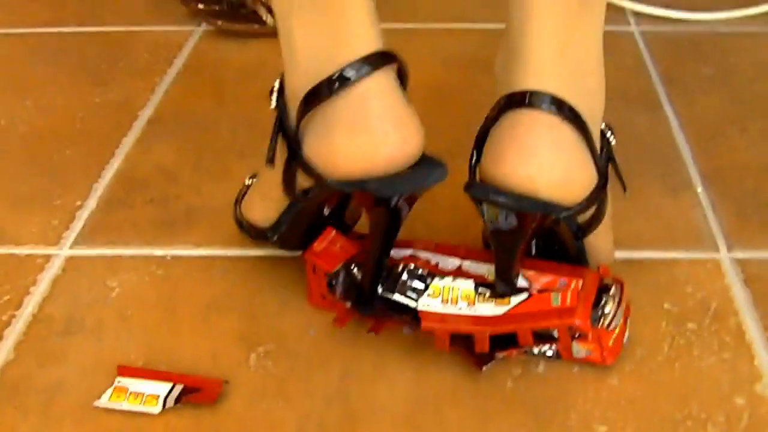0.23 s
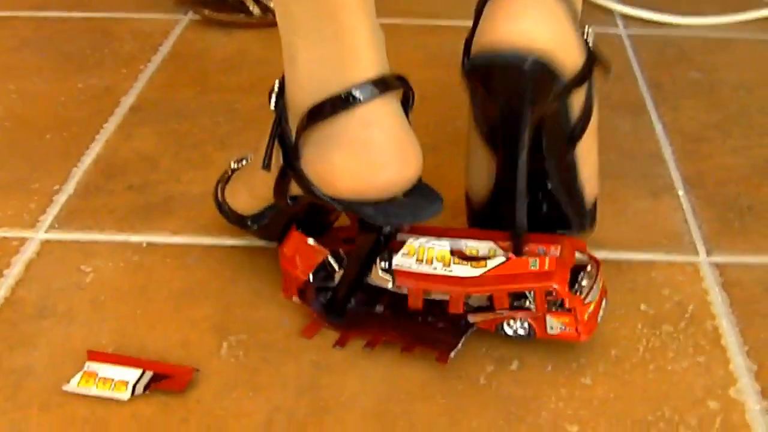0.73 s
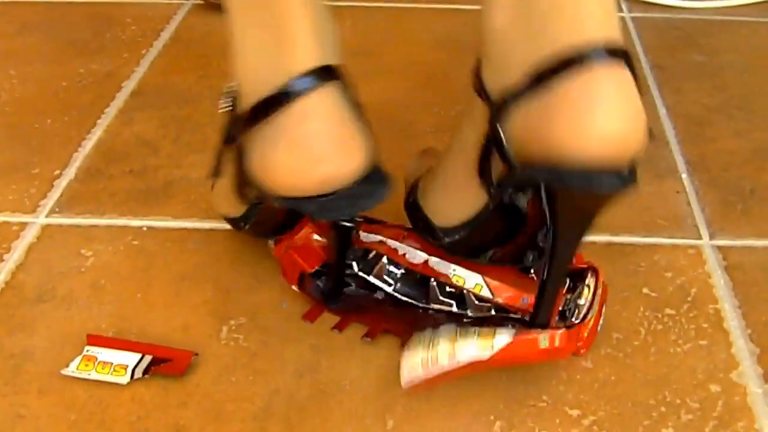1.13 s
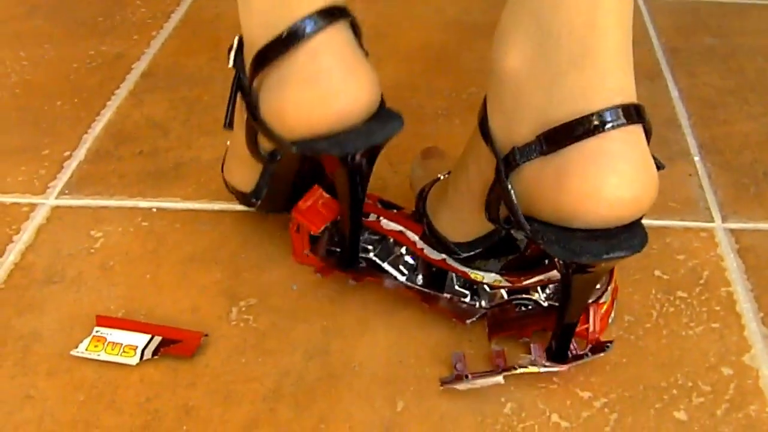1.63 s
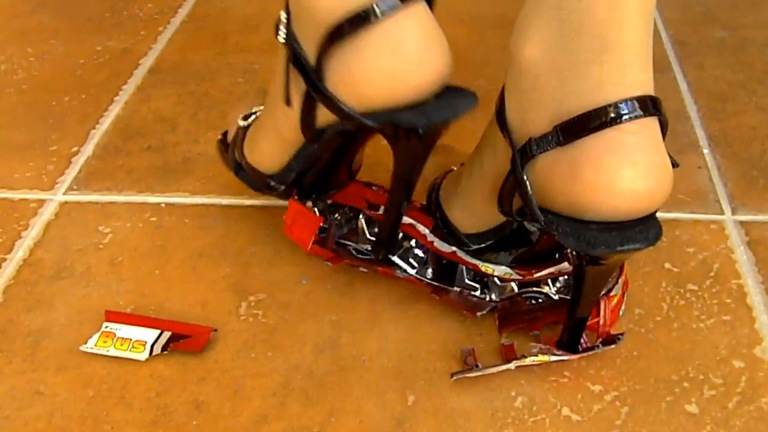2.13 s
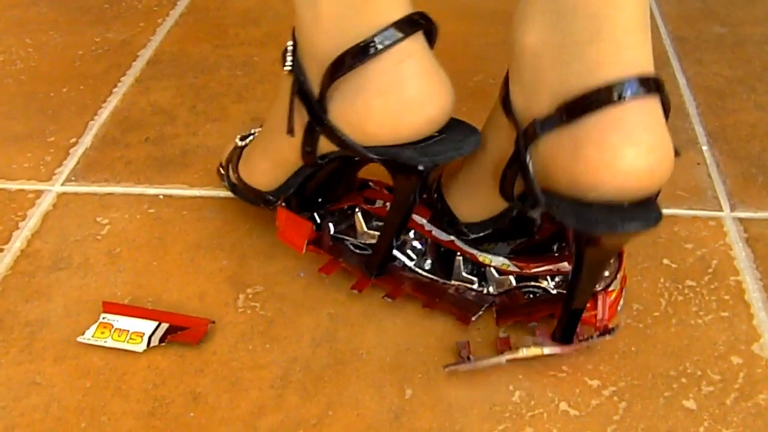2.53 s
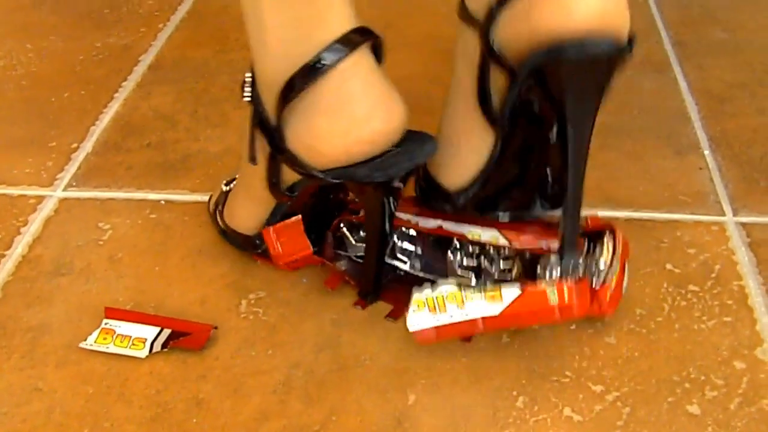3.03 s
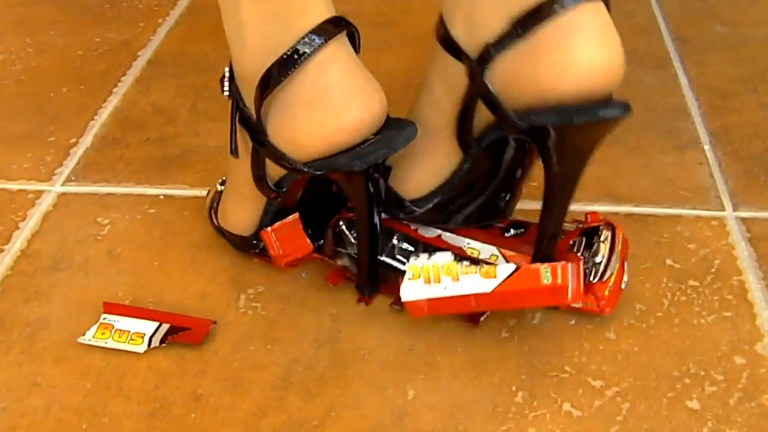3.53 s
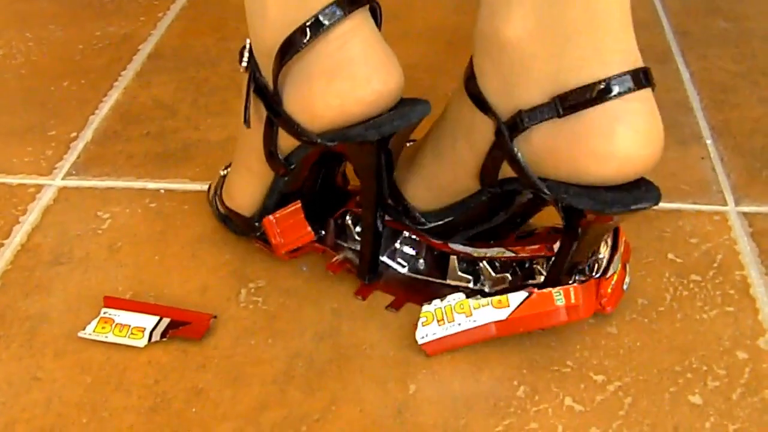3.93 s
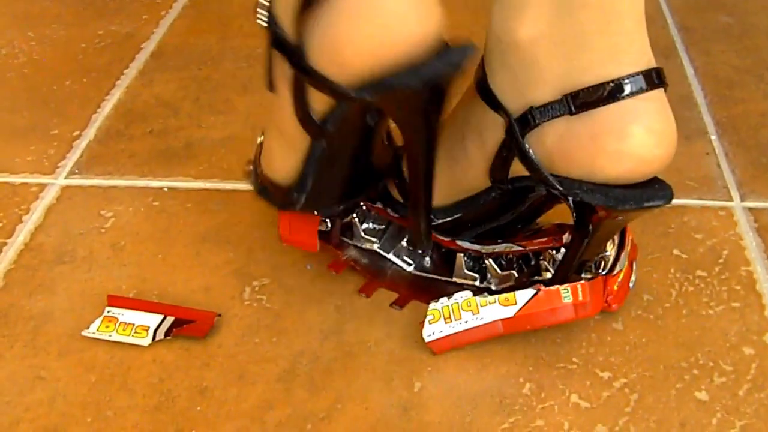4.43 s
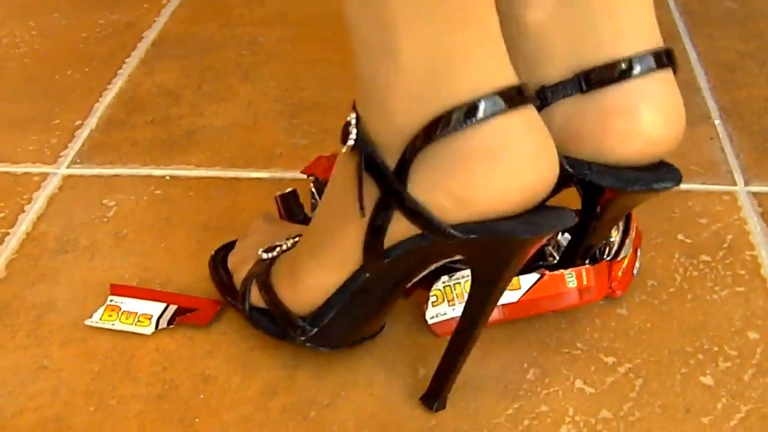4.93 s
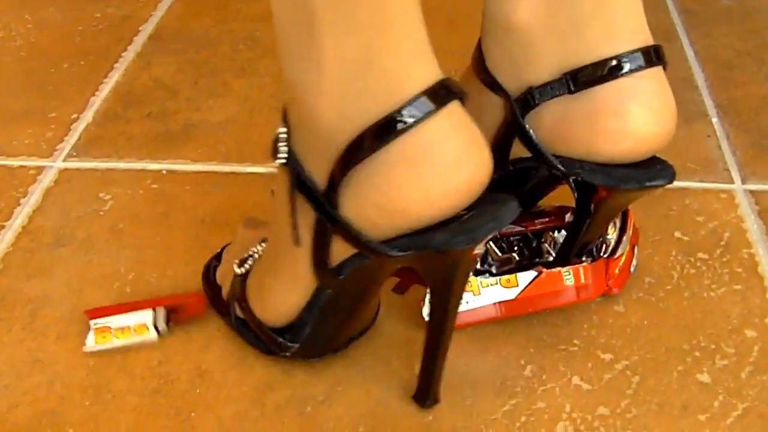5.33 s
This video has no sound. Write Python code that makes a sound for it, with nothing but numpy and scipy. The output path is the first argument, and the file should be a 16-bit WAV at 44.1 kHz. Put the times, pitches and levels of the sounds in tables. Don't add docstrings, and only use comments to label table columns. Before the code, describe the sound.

Brittle plastic shell snaps, creaks and splinters in uneven bursts beneath a heeled shoe, close and distorted, with a hard hall-like echo and faint hum.

```python
import sys
import numpy as np
from scipy import signal
from scipy.fft import rfft, irfft
from scipy.io import wavfile
from scipy.ndimage import uniform_filter1d

SR = 44100
rng = np.random.default_rng(int(sys.argv[2]) if len(sys.argv) > 2 else 0)


def volts_from_db(level):
    exponent = np.asarray(level, float) / 20
    return 10 ** exponent


def wav_record(signal):
    frames = np.transpose(np.atleast_2d(signal))
    bounded = np.clip(frames, -1, 1)
    quanta = np.round(bounded * 32767).astype(np.int16)
    wavfile.write(sys.argv[1], SR, quanta)


N = 246078
LEAD = SR // 2


def evened(x):
    return x / np.sqrt(np.mean(x ** 2) + 1e-20)


def read(points, hz):
    f, value = np.transpose(points)
    return np.interp(np.log(hz + 1), np.log(f + 1), value)


def modes(table, hz):
    return sum(volts_from_db(db) ** 2 / (1 + (2 * (hz - f) / width) ** 2) ** 1.84 for f, width, db in table)


def causal(db):
    log_gain = np.log(volts_from_db(np.maximum(db, -90)))
    circle = np.concatenate([log_gain, log_gain[..., -2:0:-1]], -1)
    return np.exp(np.conj(signal.hilbert(circle)))[..., :log_gain.shape[-1]]


def hiss():
    # (frequency [Hz], density [dB per Hz])
    hiss_spectrum = [(12, -32), (20, 0), (181, -4.5), (637, -10.5), (736, -13.5), (1380, -16), (1520, -16),
                     (4520, -21), (5360, -22), (6500, -61), (8450, -91), (14300, -120)]
    hz = np.fft.rfftfreq(N, 1 / SR)
    white = rfft(rng.standard_normal(N))
    return volts_from_db(-60.5) * evened(irfft(white * volts_from_db(read(hiss_spectrum, hz)), N))


def hum():
    # (approximate frequency [Hz], rms level [dB])
    partials = [(59.2, -65), (118.4, -66.5), (177.6, -66.5), (242.2, -69), (301.5, -70.5), (360.7, -76)]
    mains_hz, pulse_s = 60, .004
    t = np.arange(N) / SR - pulse_s
    return sum(volts_from_db(db) * np.sqrt(2) * np.cos(2 * np.pi * (k + 1) * mains_hz * t)
               for k, (_, db) in enumerate(partials))


def spread(x, tails):
    turn = np.pi * 85. * np.arange(len(x)) / SR
    gates = [np.sqrt(2 / 3) * np.cos(turn + k * np.pi / 3) for k in range(3)]
    return sum(signal.fftconvolve(x * g, tail)[:len(x)] for g, tail in zip(gates, tails))


def hall(x):
    # (frequency [Hz], t60 [s])
    decay = [(200, 0.65), (530, 1), (1400, 0.97), (3700, 0.84), (6000, 0.71)]
    level_db, rise_ms = -13, 22.1
    hz, t, z = signal.stft(rng.standard_normal((3, SR + SR // 2)), SR, nperseg=256)
    tails = signal.istft(z * volts_from_db(-60 * t / read(decay, hz)[:, None]), SR, nperseg=256)[1]
    tail_ms = np.arange(tails.shape[1]) * 1000 / SR
    tails *= 1 - np.exp(-(tail_ms / rise_ms) ** 2)
    return volts_from_db(level_db) * spread(x, tails / np.linalg.norm(tails, axis=1, keepdims=True))


def far_walls(x):
    # (delay [ms], level [dB])
    late_echoes = [
        (31.5, -26.5),
        (40., -28.5),
        (50., -24.5),
    ]
    return sum(volts_from_db(db) * np.roll(x, round(ms * SR / 1000)) for ms, db in late_echoes)


def near_wall(x):
    # (delay [ms], level [dB], t60 [ms])
    scatter = (4.4, -7.5, 33.4)
    ms, db, t60_ms = scatter
    t = np.arange(1600) * 1000 / SR - ms
    sparse = rng.standard_normal((3, 1600)) * (rng.random((3, 1600)) < .06)
    taps = sparse * (t > 0) * volts_from_db(-60 * t / t60_ms)
    mirror = volts_from_db(-16.0) * np.roll(x, round((ms + 0.699) * SR / 1000))
    return mirror + volts_from_db(db) * spread(x, taps / np.linalg.norm(taps, axis=1, keepdims=True))


def thumps():
    # (time [s], level [dB], frequency [Hz])
    landings = [
        (0.292, -46, 130),
        (2.585, -34.5, 70),
        (2.642, -27.5, 59.5),
        (3.583, -38, 100.5),
        (4.618, -38, 194),
        (2.722, -40, 50),
        (4.808, -30.5, 174),
        (4.847, -35, 200),
    ]
    out, t = np.zeros(N + SR), np.arange(SR // 4) / SR
    for s, db, hz in landings:
        push = np.sin(2 * np.pi * hz * t) * np.exp(-t * hz / 1.2)
        out[round(s * SR) + LEAD:][:len(t)] += volts_from_db(db) * push
    return out[:N + LEAD]


def scrapes():
    # (start [s], length [s], level [dB], ring [Hz], width
    # [Hz])
    drags = [
        (3.288, 0.15, -47, 4000, 1600),
        (3.47, 0.1, -50.5, 2900, 1510),
        (4.112, .06, -53, 1240, 350),
        (5.281, 0.092, -53.5, 4310, 402),
        (4.68, 0.078, -54, 205, 60),
        (4.88, 0.36, -54.5, 200, 160),
    ]
    grit_per_s, grit_spread_db = 2000, 7
    out = np.zeros(N + LEAD + SR)
    for s, length, db, ring_hz, width in drags:
        chance, size = rng.random((SR // 2, 2)).T
        grit = (chance < grit_per_s / SR) * volts_from_db(-grit_spread_db * np.log(size + 1e-3))
        grit *= np.cos(1e4 * size)
        ring = modes([(ring_hz, width, 0)], np.fft.rfftfreq(len(grit), 1 / SR))
        drag = np.sin(np.pi * np.minimum(np.arange(len(grit)) / SR / length, 1) ** 0.57)
        out[round(s * SR) + LEAD:][:len(grit)] += volts_from_db(db) * drag * evened(irfft(rfft(grit) * np.sqrt(ring)))
    return out[:N + LEAD]


def snaps(rows, ms):
    # (frequency [Hz], width [Hz], level [dB])
    knock_modes = [(200, 150, -1.5), (639, 690, 2)]
    hollow_modes = [(1243, 392, 0.35)]
    body_modes = [(1870, 1230, -1.2), (2386, 390, 0.)]
    bright_modes = [(3285, 1550, 2.5), (4200, 1700, -4), (4855, 2470, -0.5)]
    s, peak_db, knock_db, hollow_db, bright_db, shard_hz = np.transpose(rows)[:, :, None]
    size = 1024
    t, hz = np.arange(size) / SR, np.fft.rfftfreq(size, 1 / SR)
    envelope = (1 - np.exp(-t / 0.00031)) * np.exp(-t * 1000 / ms)
    burst = rfft(rng.standard_normal((len(rows), size)) * envelope)
    lumps = uniform_filter1d(abs(burst) ** 2, size=11, axis=1)
    parts = zip((knock_db, hollow_db, bright_db), (knock_modes, hollow_modes, bright_modes))
    shell = modes(body_modes, hz) + sum(volts_from_db(db) ** 2 * modes(table, hz) for db, table in parts)
    shell += modes([(shard_hz, 0.23 * shard_hz, 6.)], hz)
    shell *= (hz + 1) ** 2 / (hz ** 2 + 185.0 ** 2)
    gain_db = 10 * np.log10(shell * lumps.mean(1, keepdims=True) / lumps)
    crack = irfft(burst * causal(gain_db), size)
    crack *= signal.windows.tukey(2 * size, .5)[size:]
    sound = volts_from_db(peak_db + 0.0) * crack / abs(signal.hilbert(crack)).max(1, keepdims=True)
    at = np.round(s * SR).astype(int) + LEAD + np.arange(size)
    return np.bincount(at.ravel(), sound.ravel(), N + LEAD + size)[:N + LEAD]


def creaks():
    # (start [s], end [s], slips per second [1/s], peak [dB], shard ring [Hz])
    steady = [
        (1.019, 1.073, 470, -23, 2060),
        (2.293, 2.323, 240, -30, 1700),
        (4.115, 4.148, 216, -23.5, 1200),
        (4.165, 4.175, 190, -28, 1290),
        (4.718, 4.756, 190, -30, 3600),
        (5.281, 5.338, 300, -50, 4280),
    ]
    ragged = [
        (1.403, 1.46, 240, -39, 2280),
        (2.327, 2.38, 270, -31.5, 1900),
        (2.538, 2.596, 226, -30, 1700),
        (2.669, 2.745, 240, -16, 2700),
        (3.466, 3.562, 410, -38, 2620),
        (3.968, 4.044, 89, -35, 1260),
        (4.525, 4.623, 180, -30.5, 2530),
        (4.8, 4.823, 1060, -16.5, 1595),
        (5.489, 5.519, 390, -46, 1300),
        (5.542, 5.584, 267, -32.5, 1390),
    ]
    rows = []
    trains = [(*row, 0.18) for row in steady] + [(*row, .55) for row in ragged]
    for start, end, rate, peak_db, shard_hz, uneven in trains:
        gap, size, dull, sharp = rng.standard_normal((40, 4)).T
        s = start + np.cumsum(np.exp(uneven * gap - uneven ** 2 / 2)) / rate - 1 / rate
        db = np.where(s < end, peak_db + 5.5 * uneven * size, -200)
        s = np.clip(s, 0, N / SR)
        ring_hz = shard_hz * np.exp(0.056 * dull)
        rows += zip(s, db, -18. + 0 * s, -4. + 0.89 * dull, -6.5 + 6 * sharp, ring_hz)
    return snaps(rows, ms=0.43)


def cracks():
    # (time [s], peak [dB], shard ring [Hz], knock [dB re body], hollow [dB re body])
    breaks = [(-.12, 0, 1790, -8, 5), (0.5104, 11.5, 2050, -5, -9), (0.5152, 2, 2900, -15.5, 10.5),
              (0.9896, 6.5, 2870, -16, -16), (0.9919, 4, 2112, -19, -28), (1.0749, 4, 2120, -12.5, -19),
              (1.1593, -5.5, 1710, -12.5, -12), (1.3909, -7, 3180, -8, -0.5), (1.4461, 2.5, 3670, -31, -8),
              (1.45, 9.5, 1734, -13, -5), (2.3167, -6, 2570, -38, 3), (2.5844, 3.5, 3260, -10.5, -2),
              (2.621, 4, 2910, -7, 2), (2.644, 6, 2400, -9.5, -9), (2.651, 2, 2980, -2, 3),
              (2.6664, -3, 1600, -24, -3), (2.7951, -3, 850, -7, 11.5), (3.0119, -13, 1980, 1.5, 9),
              (3.272, -8.5, 2950, -10, -1.5), (3.5813, -9, 2560, -5.5, 0),
              (3.759, -2.5, 2580, -11.5, -30.5), (4.6054, -14.5, 900, -16, 10),
              (4.6237, -8.5, 2800, -14, 5.5), (4.8077, -13.5, 1710, -2, -13)]
    # (time [s], peak [dB], shard ring [Hz])
    dry_snaps = [(0.4926, -27, 2380), (.7139, -33, 2200), (1.1469, -8.5, 2530), (1.4172, -23, 2410),
                 (1.4222, -20, 2370), (2.1006, -22.5, 2170), (2.155, -26.5, 1510), (2.1676, -19.5, 2250),
                 (2.212, -20.5, 2460), (2.2894, -22.5, 1640), (2.303, -20.5, 1740), (2.3471, -20.5, 2450),
                 (2.3526, -22.5, 2390), (2.3615, -22, 1770), (2.5363, -26.5, 2670), (3.0358, -30, 2430),
                 (3.207, -30, 2370), (3.6961, -21.5, 2360), (3.7506, -32, 2580), (3.963, -22, 1560),
                 (4.045, -28.5, 1740), (4.1506, -19, 1210), (4.2026, -12, 3150), (4.4042, -24, 2410),
                 (4.5345, -29, 2430), (4.552, -28.5, 1870), (4.669, -24, 2050), (4.7315, -29.5, 2360),
                 (4.8887, -15.5, 2310), (4.9286, -36, 1700)]
    # (time [s], peak [dB], shard ring [Hz], hollow [dB re body])
    pops = [(0.6777, -18.5, 2240, 9), (1.2857, -27.5, 1550, 4), (1.3394, -9, 2340, 5),
            (1.3725, -20, 2560, 5), (1.7787, -25.5, 1940, 7.5), (2.3679, -36, 1920, -4),
            (2.5773, -19.5, 3290, 12), (2.9191, -14.5, 1770, 5), (3.5, -32, 2450, 13.5),
            (3.5509, -22.5, 3290, 16), (3.5602, -17.5, 3850, -1.5), (3.732, -21, 2370, 9.5),
            (3.8574, -35.5, 2350, 12), (3.8955, -23.5, 1265, -5), (3.9416, -24, 1270, -2),
            (3.9838, -26, 3470, 9), (4.0714, -23.5, 2560, 7), (4.0974, -29, 2390, 1),
            (4.1072, -22.5, 2570, 2), (4.1116, -18.5, 2440, 1), (4.1681, -21.5, 1200, 3),
            (4.1844, -17, 1200, 3), (4.2278, -16.5, 1210, 5.5), (4.2954, -15, 1480, 6),
            (4.393, -15.5, 2370, 7.5), (4.4415, -22, 2350, 7), (4.5627, -27, 2560, 5.5),
            (4.7588, -24, 2420, 3.5), (4.771, -14.5, 3430, 4.5), (4.7954, -21, 2350, 6)]
    # (time [s], peak [dB], shard ring [Hz], knock [dB re body])
    knocks = [(0.1399, -28, 2100, -11), (0.4836, -41, 3230, 3), (0.8755, -29.5, 3100, 3.5),
              (1.2623, -14, 1960, -5), (1.4366, -18.5, 2420, 5), (1.7566, -27.5, 1510, 6.5),
              (2.1274, -32, 3150, -3), (2.1898, -28, 1690, -3), (2.193, -33, 2780, 5),
              (2.2065, -26.5, 2440, -0.5), (2.727, -11, 910, -4.5), (2.9993, -35.5, 2540, -13),
              (3.0755, -30, 2470, 3), (3.2139, -28.5, 2000, 2.5), (3.3036, -33, 3250, 10),
              (3.485, -39, 2700, 5), (3.5469, -27, 4870, -1), (4.5182, -34, 2450, -4),
              (4.5733, -30.5, 2480, 3), (4.5822, -23, 1300, -7), (4.6041, -27, 1290, -8),
              (4.8442, -11.5, 620, 10), (4.8633, -20.5, 2430, 5), (4.899, -24, 2350, 7),
              (5.0093, -28, 3110, 1.5), (5.1413, -43.5, 1940, 10.5), (5.2255, -29, 860, -3),
              (5.542, -23, 1650, 9), (5.5526, -35, 1660, -1), (5.565, -23, 4150, 1)]
    # (time [s], peak [dB], shard
    # ring [Hz], bright [dB re body])
    splinters = [(.4738, -37.5, 3530, 0), (1.2025, -19, 2520, 1), (1.4546, -1.5, 2400, -10),
                 (1.8171, -23, 2300, 0), (1.9427, -16.5, 2120, -0.5), (2.0552, -20, 4620, -4),
                 (2.1647, -20.5, 2350, 3.5), (2.2713, -21.5, 2350, -2), (2.647, 5.5, 3250, 14),
                 (3.256, -32, 4200, 6), (3.3116, -26.5, 4440, -5), (3.4613, -33, 3380, 4),
                 (3.542, -33, 3510, -4), (3.6155, -25, 2420, 0), (3.8728, -32, 1250, -7),
                 (3.6693, -21, 3920, -13), (3.7177, -30.5, 2730, -3), (3.8073, -18.5, 2350, 3),
                 (3.8318, -13.5, 3250, 6), (3.9174, -25.5, 1250, -4), (4.0098, -27, 2520, 9),
                 (4.028, -26, 3340, 13), (4.7468, -33, 3240, 5), (4.754, -31, 3680, 8),
                 (5.2441, -40, 2220, 6), (5.2575, -27, 5130, -10.5), (5.2782, -27.5, 4500, 17),
                 (5.3036, -33.5, 4440, -8), (5.3192, -48, 4150, 14), (5.3377, -39, 4350, 16.5)]
    # (first peak [dB], loss per step [dB], shard ring [Hz])
    seam_tear = (-17, 1.6, 1800)
    # (peak [dB], burst [ms])
    tear = [(-30, .9), (-27.5, 1.37)]
    first_db, loss_db, seam_hz = seam_tear
    seam_start_s, seam_step_s = 2.3866, .0191
    seam = [(seam_start_s + k * seam_step_s, first_db - k * loss_db, seam_hz) for k in range(4)]
    # what each kind leaves in the other parts of the shell, dB re the body
    rows = [(s, db, knock, hollow, -4.5, hz) for s, db, hz, knock, hollow in breaks]
    rows += [(s, db, -23.5, -7, -8.5, hz) for s, db, hz in dry_snaps + seam]
    rows += [(s, db, -19, hollow, -6.5, hz) for s, db, hz, hollow in pops]
    rows += [(s, db, knock, -1.5, -9, hz) for s, db, hz, knock in knocks]
    rows += [(s, db, -11, -7, bright, hz) for s, db, hz, bright in splinters]
    burst_ms = np.interp([row[1] for row in rows], *np.transpose(tear))
    return snaps(rows, burst_ms[:, None])


def scene():
    toy = cracks() + creaks() + scrapes() + thumps()
    early = toy + near_wall(toy)
    room = early + far_walls(early) + hall(toy)
    return (room[LEAD:] + hiss() + hum())[None]


def top_cut(x):
    return signal.sosfilt(signal.butter(12, 16800, fs=SR, output="sos"), x)


def record(dry):
    overload, ceiling, edge_hz = 0.78, 0.73, 5502
    squashed = np.clip(dry, -overload, overload)
    treble_cut = signal.firwin(101, edge_hz, window=("kaiser", 9.), fs=SR)[None]
    dull = signal.oaconvolve(squashed, treble_cut, "same")
    clipped = np.clip(dull, -ceiling, ceiling)
    flat = signal.oaconvolve(clipped, signal.firwin(61, 15800, fs=SR)[None], "same")
    return top_cut(flat)


dry = scene()
out = record(dry)
wav_record(out)
```